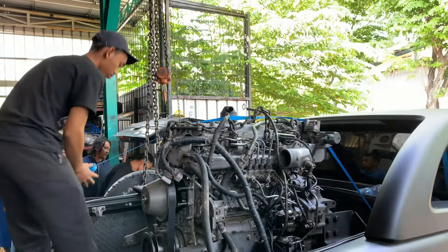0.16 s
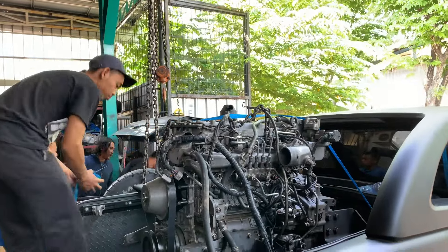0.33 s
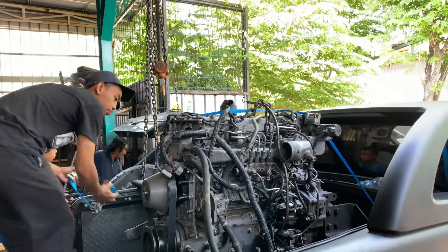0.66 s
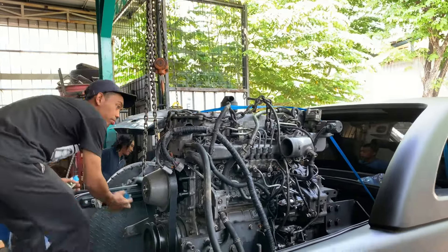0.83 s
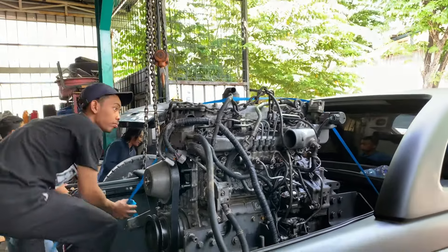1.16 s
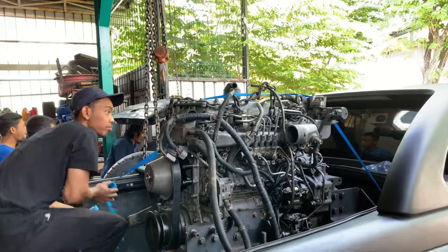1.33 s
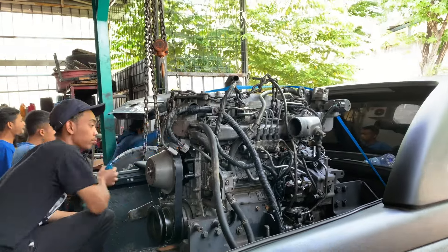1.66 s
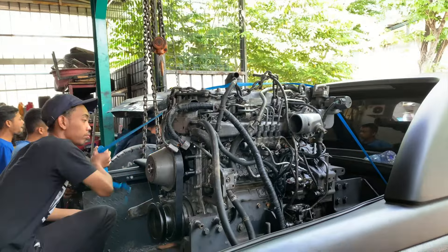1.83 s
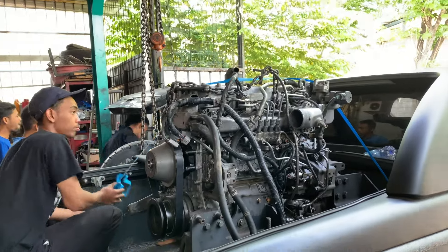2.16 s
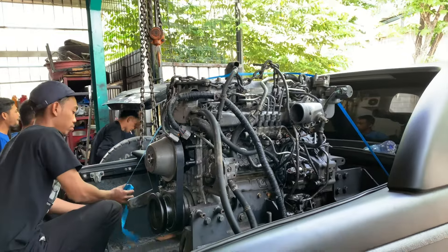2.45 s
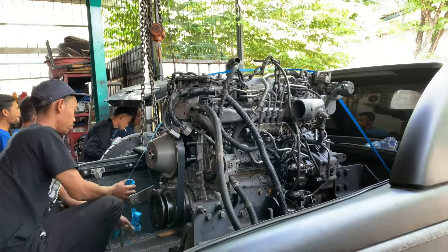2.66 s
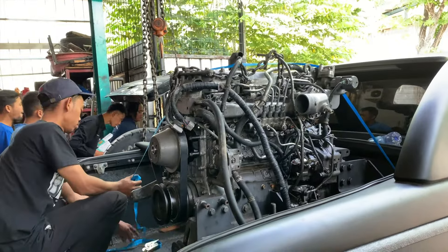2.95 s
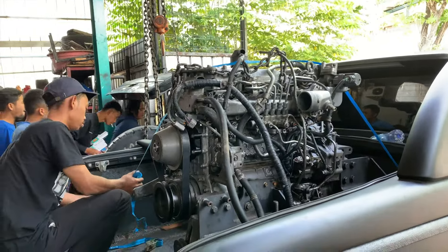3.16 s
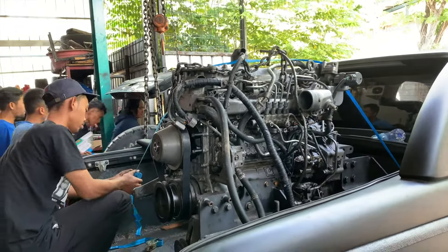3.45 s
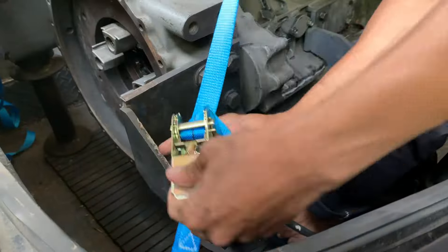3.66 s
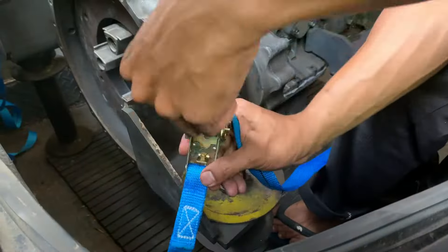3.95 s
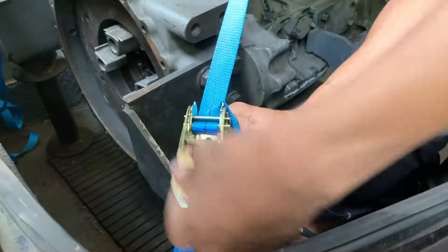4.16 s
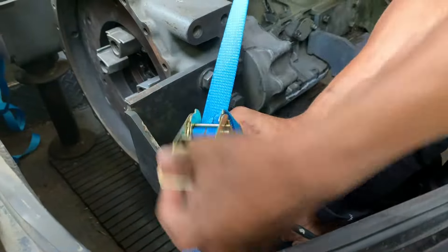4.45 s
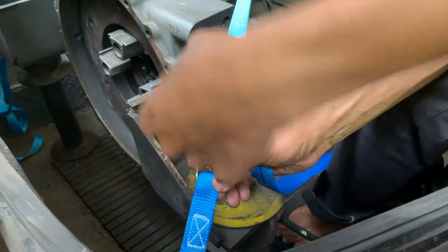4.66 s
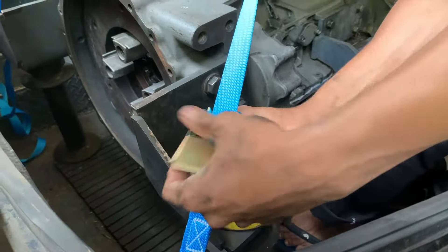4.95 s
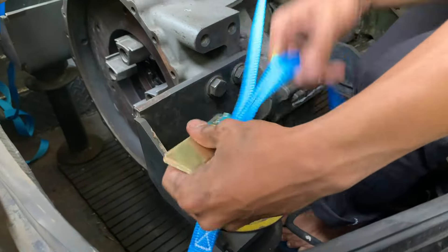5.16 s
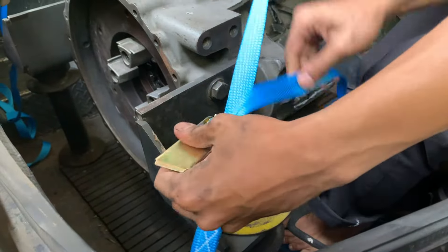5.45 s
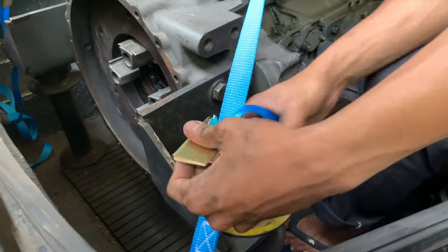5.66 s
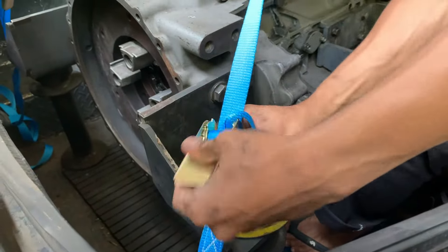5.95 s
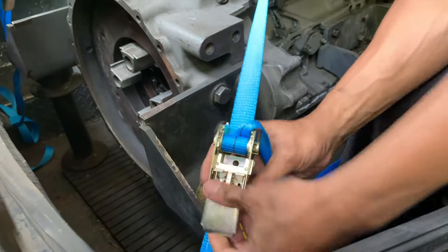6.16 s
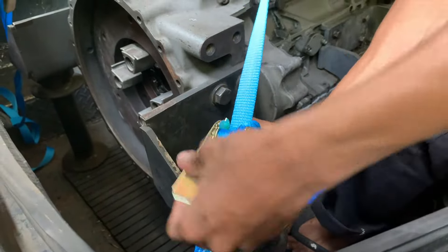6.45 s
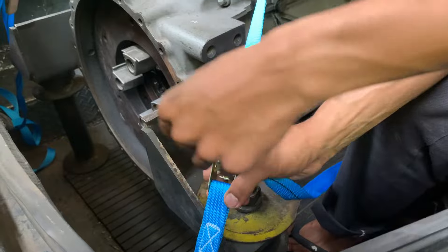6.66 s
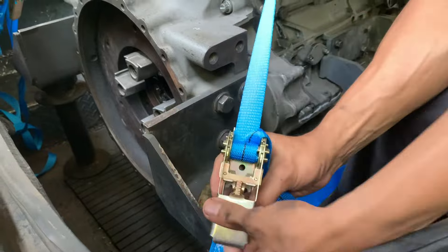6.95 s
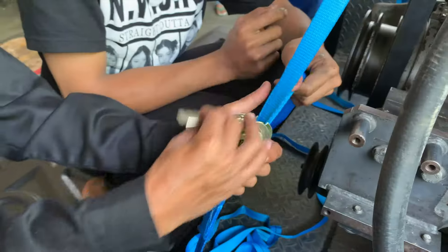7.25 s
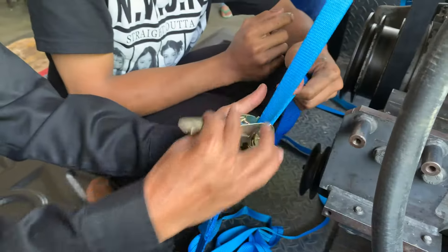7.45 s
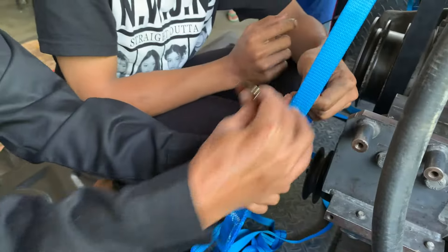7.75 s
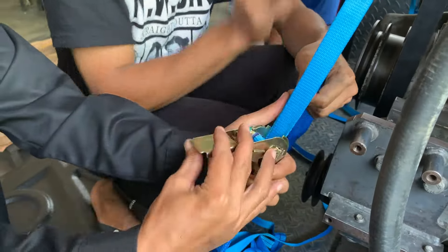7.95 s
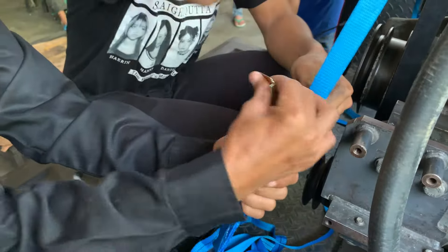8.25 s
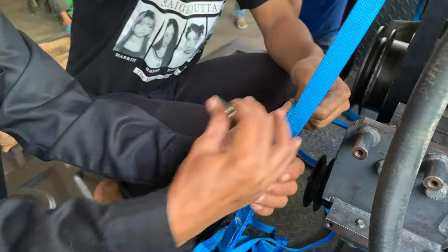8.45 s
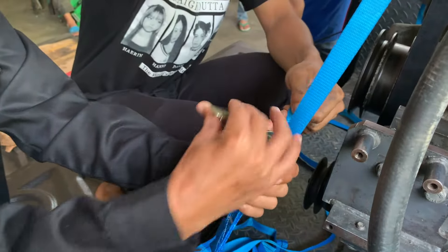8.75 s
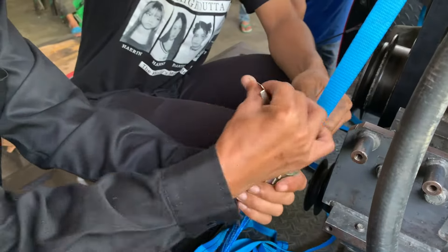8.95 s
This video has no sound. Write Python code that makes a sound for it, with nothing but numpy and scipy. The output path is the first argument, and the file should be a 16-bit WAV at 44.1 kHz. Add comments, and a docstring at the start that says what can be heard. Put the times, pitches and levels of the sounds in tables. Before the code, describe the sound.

A ratchet strap is tightened in sharp, irregular metallic clicks after a few clangs, over distant traffic rumble in an open workshop.

```python
"""An open workshop, where a ratchet strap is tightened. Traffic roars far off; engines pass and idle outside.
Webbing rubs, metal parts clang on a floor further off, low thumps sound. Steel pawls snap over the teeth and
ring the buckle's frame; the handle clacks on its stop. The gain ducks after loud clicks, and both channels
carry one treble signal, shifted in phase."""
import sys
import numpy as np
from scipy import signal
from scipy.fft import rfft, irfft, next_fast_len
from scipy.io import wavfile
from scipy.ndimage import uniform_filter1d, minimum_filter1d, map_coordinates

SR = 44100
rng = np.random.default_rng(int(sys.argv[2]) if len(sys.argv) > 2 else 0)


def generate_wav(sig):
    """Save sig (samples, or channels by samples) to the path in sys.argv[1] as 16-bit PCM at SR."""
    pcm = np.round(np.clip(np.atleast_2d(sig).T, -1, 1) * 32767).astype(np.int16)
    wavfile.write(sys.argv[1], SR, pcm)


N = 401310


def amp(db):
    """dB to gain."""
    return 10 ** (np.asarray(db) / 20)


def unit(x):
    """Scale to rms 1."""
    return x / np.sqrt(np.mean(x ** 2) + 1e-20)


def along(points, hz):
    """Interpolate (freq_hz, value) points on a log axis."""
    freq_hz, values = np.transpose(points)
    return np.interp(np.log(hz + 1), np.log(freq_hz + 1), values)


def curves(spans):
    """Per-sample curve of each column after time_s, then a gate open during the spans."""
    t = np.arange(N) / SR
    time_s, *columns = np.transpose(np.vstack(spans))
    gate = sum((t >= rows[0][0]) & (t < rows[-1][0]) for rows in spans)
    return [np.interp(t, time_s, c) for c in columns] + [uniform_filter1d(gate * 1., size=400)]


def wobble(rate_hz):
    """Smooth random curve, rate_hz knots a second."""
    knots = rng.standard_normal(int(N * rate_hz / SR) + 4)
    return map_coordinates(knots, [np.arange(N) * rate_hz / SR])


def filtered(x, response):
    """Apply a complex frequency response."""
    size = next_fast_len(x.shape[-1] + 8192)
    return irfft(rfft(x, size) * response(np.fft.rfftfreq(size, 1 / SR)), size)[..., :x.shape[-1]]


def coloured(shape, spectrum):
    """Shaped noise, rms 1."""
    return unit(filtered(rng.standard_normal(shape), lambda hz: amp(along(spectrum, hz))))


def add_at(out, start_s, sound):
    """Mix in a sound, cut at the end of out."""
    room = out[..., round(start_s * SR):][..., :sound.shape[-1]]
    room += sound[..., :room.shape[-1]]


# Left-right likeness of the noise: freq_hz, correlation
LIKENESS = [(60, 0.95), (150, 0.89), (380, 0.39), (950, -0.11), (2380, -0.11), (5980, -0.053),
            (15000, 0.15)]


def stereo_noise(spectrum, patchy_db):
    """Shaped stereo noise, rms 1, with random gain patches in time and frequency."""
    bins = signal.stft(rng.standard_normal((2, N)), nperseg=512)[2]
    patches = uniform_filter1d(rng.standard_normal(bins.shape[1:]), size=6, axis=0)
    patches = unit(uniform_filter1d(patches, size=12, axis=1))
    pair = signal.istft(bins * amp(patchy_db * patches), nperseg=512)[1][:, :N]

    def response(hz):
        angle = np.arccos(np.clip(along(LIKENESS, hz), -1, 1)) / 2
        return amp(along(spectrum, hz)) * [np.cos(angle), np.sin(angle)]
    mid, side = filtered(pair, response)
    return unit(np.array([mid + side, mid - side]))


def rattle(t, rattle_ms, fast_t60_s, tail_t60_s, tail_db, spiky_db):
    """Envelope of steel chattering in tiny rebounds: holds, then falls fast to a slower tail."""
    min_flight_s, max_flight_s, contact_s = .0012, .0027, .0005
    flights_s = rng.uniform(min_flight_s, max_flight_s, int(t[-1] / min_flight_s) + 2)
    hits_s = np.cumsum(flights_s) - flights_s[0]
    latest = np.searchsorted(hits_s, t, side="right") - 1
    strength = np.where(latest, rng.uniform(0, .85, len(hits_s))[latest], 1)
    spikes = strength * np.exp(-(t - hits_s[latest]) / contact_s)
    after_s = np.maximum(t - rattle_ms / 1000, 0)
    fall = amp(-60 * after_s / fast_t60_s) + amp(tail_db - 60 * after_s / tail_t60_s)
    return fall * amp(spiky_db * (spikes - .5)) * (1 - np.exp(-t / .0001))


def resonances(peaks, grip_detune=.012):
    """Response of (pitch_hz, width_hz, level_db) peaks; level and pitch vary at each blow."""
    gains = amp(rng.normal(0, 3, len(peaks)))
    tune = 1 + grip_detune * rng.normal(size=len(peaks))
    return lambda hz: sum(
        (-1) ** k * gains[k] * amp(level_db) * 1j * hz * width_hz
        / ((pitch_hz * tune[k]) ** 2 - hz * hz + 1j * hz * width_hz)
        for k, (pitch_hz, width_hz, level_db) in enumerate(peaks))


# Background levels as heard, three spans, with a brief gain dip after the thump at 6 s:
# time_s, rumble_db, roar_db
BACKGROUND_LEVELS = [
    [(0.0, -34, -34), (0.93, -32.5, -32), (1.72, -32, -33.5), (2.05, -31, -34), (2.3, -31, -33),
     (3.07, -29, -28.5), (3.65, -34, -31.5)],
    [(3.67, -34, -32), (3.87, -36.5, -35), (4.31, -36.5, -37.5), (4.6, -37, -37.5), (5.67, -42.5, -40),
     (5.97, -36, -40), (6.0, -30.5, -50), (6.13, -41, -45.5), (6.3, -38.5, -39), (6.6, -39, -38),
     (7.17, -46, -41)],
    [(7.19, -39, -31), (7.402, -46, -35.5), (8.152, -37.5, -34.5), (8.706, -39, -35.5), (9.1, -32.5, -35.5)],
]
# Upper bands per span, relative to the roar: start_s, rush_db, hiss_db
BACKGROUND_BALANCE = [(0, -8.5, -19.5), (3.66, -10, -16), (7.18, -9, -12.5)]
# Spectra of the four bands: freq_hz, density_db
RUMBLE_SPECTRUM = [(15, -66), (25, -62), (48, -3), (91, 0), (108, -7), (150, -7.5), (200, -9), (260, -34.5),
                   (440, -120)]
ROAR_SPECTRUM = [(71, -15), (120, -11), (249, -9), (403, -11.5), (661, -17), (931, -15.5), (1210, -22),
                 (1370, -24.5), (2000, -30), (2600, -61), (4400, -120)]
RUSH_SPECTRUM = [(710, -20), (1200, 4), (1380, 2), (2680, -0.5), (3130, -2.5), (5000, -12), (7500, -16.5),
                 (9750, -57), (16500, -120)]
HISS_SPECTRUM = [(4500, -4), (6500, -11), (8500, -3.5), (11000, -7), (13000, -10), (15800, -12),
                 (16200, -52)]


def background(hiss_swing=1.89):
    """Far traffic as heard: rumble, roar, rush and thin hiss, with a brief gain dip at 6 s."""
    rumble_db, roar_db, _ = curves(BACKGROUND_LEVELS)
    starts_s, *balance_db = np.transpose(BACKGROUND_BALANCE)
    span = np.searchsorted(starts_s[1:], np.arange(N) / SR)
    rush_db, hiss_db = np.array(balance_db)[:, span]
    hiss_db += roar_db.mean() + hiss_swing * (roar_db - roar_db.mean())
    swell = wobble(6.8)
    rumble = amp(rumble_db + .32 * wobble(20)) * stereo_noise(RUMBLE_SPECTRUM, patchy_db=1.2)
    roar = amp(roar_db + .27 * swell) * stereo_noise(ROAR_SPECTRUM, patchy_db=2.2)
    rush = amp(roar_db + rush_db + swell) * stereo_noise(RUSH_SPECTRUM, patchy_db=1)
    hiss = amp(hiss_db + .8 * wobble(8.2)) * stereo_noise(HISS_SPECTRUM, patchy_db=1)
    return rumble + roar + rush + hiss


def engine(spans, orders, swell_db, waver_rad):
    """Multiples of a firing rate, each swelling and wavering on its own."""
    firing_hz, level_db, gate = curves(spans)
    phase = 2 * np.pi * np.cumsum(firing_hz) / SR
    tone = sum(amp(order_db + swell_db * wobble(6.6)) * np.sin(multiple * phase + waver_rad * wobble(7))
               for multiple, order_db in orders)
    return amp(level_db) * gate * unit(tone)


# Engine runs, the idle in two spans: time_s, firing_hz, level_db
PASSING_RUN = [(0.85, 32.8, -62), (1.014, 34.1, -32), (1.3, 30.59, -31.5), (1.86, 27.06, -26),
               (2.4, 25.2, -43)]
IDLE_RUNS = [
    [(1.9, 34.54, -38.5), (2.9, 38, -30.5), (3.124, 34.22, -26), (3.252, 34.35, -30.5), (3.408, 36.58, -29),
     (3.65, 36.96, -27)],
    [(7.17, 35.74, -32), (7.508, 34.9, -36), (7.76, 36.6, -31.5), (8.104, 35.34, -38.5), (8.6, 36.17, -37),
     (8.85, 36.43, -38.5), (8.95, 37.4, -31), (9.1, 37.6, -37)],
]
DRONE_RUN = [(3.66, 60, -31), (4.04, 59.4, -25.5), (4.37, 61.9, -32), (5.12, 59.8, -38.5), (5.4, 56, -48),
             (5.8, 60, -40)]
# Engine harmonics: multiple, relative_db
PASSING_ORDERS = [(2, -9.5), (3, -3.5), (4, -5), (6, -17.5)]
IDLE_ORDERS = [(2, 7), (4, 1.5), (5, 1), (6, 7.5), (9, -11), (10, 1.5), (11, -2.5), (12, -7), (13, -1.5),
               (14, -14.5), (16, -12)]


def engines():
    """Outside, one engine idles, one slows as it passes, one drones."""
    idling = engine(IDLE_RUNS, IDLE_ORDERS, swell_db=2.6, waver_rad=.45)
    passing = engine([PASSING_RUN], PASSING_ORDERS, swell_db=1, waver_rad=.14)
    drone = engine([DRONE_RUN], [(1, 0)], swell_db=1.5, waver_rad=.3)
    return idling + passing + drone


# Rub strokes: centre_s, half_width_s, level_db
RUBS = [(1.575, 0.048, -38.5), (3.9, 0.22, -41), (4.57, 0.4, -46), (6.7, 0.18, -47.5), (7.42, 0.19, -46.5),
        (8.12, 0.19, -43), (8.4, 0.16, -67), (8.75, 0.33, -44)]
# Friction noise: freq_hz, density_db
RUB_SPECTRUM = [(800, -31.5), (2000, 4), (5000, 4.5), (8000, -1), (12000, -5), (15800, -10), (16200, -38)]


def webbing():
    """Webbing, hands and parts rub: scratchy noise that swells and fades."""
    t = np.arange(N) / SR
    effort = sum(amp(level_db) * np.exp(-((t - centre_s) / half_width_s) ** 2)
                 for centre_s, half_width_s, level_db in RUBS)
    scratch = amp(5.1 * wobble(25) + .86 * wobble(330))
    return effort * unit(scratch * stereo_noise(RUB_SPECTRUM, patchy_db=-4.5))


# Metal on the floor: start_s, level_db, thud_relative_db, rattle_ms, t60_s, tilt_db_per_octave, hollow_hz
CLANGS = [(1.602, -21.5, -7.5, 8, 0.24, -3, 1200), (2.125, -38.5, 12.5, 27.5, 0.089, -0.5, 2300),
          (2.255, -35.5, 12, 13, 0.12, -4, 1010), (2.573, -39.5, 6.5, 5.1, 0.059, -1, 815),
          (2.865, -15.5, -7.5, 3.7, 0.073, 5.5, 1410), (2.874, -19.5, -1, 3.8, 0.22, 0, 2040),
          (2.945, -30.5, -28, 8.9, .09, -3, 1400), (3.03, -37, -11, 11, .09, -4, 1400)]
# Chatter and thud noise: freq_hz, density_db
CLANG_SPECTRUM = [(700, -22), (1500, -11), (3800, 5), (6500, 5.5), (9000, -2), (11500, 1), (15500, -11)]
THUD_SPECTRUM = [(60, -22), (120, 10), (350, 12), (800, 3.5), (1400, 1), (2500, -13), (5000, -52)]


def clangs(hollow_db=-4.5, hollow_width_ratio=.63):
    """Loose metal dropped or knocked: a chatter, and a hollow thud that swells just after."""
    out, t = np.zeros((2, N)), np.arange(SR // 2) / SR
    shape = (2, len(t))
    for start_s, level_db, thud_db, rattle_ms, t60_s, tilt_db_per_octave, hollow_hz in CLANGS:
        chatter = rattle(t, rattle_ms, fast_t60_s=.064, tail_t60_s=t60_s, tail_db=-7.5, spiky_db=1)
        peak = resonances([(hollow_hz, hollow_width_ratio * hollow_hz, 0)])
        hollow = unit(filtered(rng.standard_normal(shape), lambda hz: peak(hz) ** 2))
        attack = 1 - np.exp(-(t / .0052) ** 2)
        fall = amp(thud_db - 60 * np.maximum(t - .03, 0) / t60_s)
        thud = attack * fall * (coloured(shape, THUD_SPECTRUM) + amp(hollow_db) * hollow)
        tilted = [(hz, db + tilt_db_per_octave * np.log2(hz / 6000)) for hz, db in CLANG_SPECTRUM]
        add_at(out, start_s, amp(level_db) * (chatter * coloured(shape, tilted) + thud))
    return out


def steel_mode(t, pitch_hz, level_db, t60_s, flicker_db, flicker_hz):
    """One decaying sine with a flickering level."""
    envelope = amp(level_db + flicker_db * wobble(flicker_hz)[:len(t)] - 60 * t / t60_s)
    return envelope * np.sin(2 * np.pi * pitch_hz * t)


# Modes of a steel tool: pitch_hz, relative_db, t60_s
TOOL_MODES = [(3595, -15, .2), (4130, -12, .25), (5870, -15, .1), (6540, -14, .08), (8295, -2, .2),
              (8670, 11, .26), (8785, -6, .2), (9020, -8, .17), (13595, 2, .3), (14100, -8, .15)]


def tool_ring(start_s=1.602, level_db=-22):
    """A steel tool rings at the first clang."""
    out, t = np.zeros(N), np.arange(SR // 2) / SR
    ring = sum(steel_mode(t, *mode, flicker_db=2.2, flicker_hz=70) for mode in TOOL_MODES)
    add_at(out, start_s, amp(level_db) * (1 - np.exp(-t / .006)) * ring)
    return out


# Steel pings: start_s, level_db, pitch_hz, t60_s
PINGS = [(2.952, -26, 11900, 0.045), (2.998, -31, 11830, 0.054), (8.32, -36, 11760, 0.14),
         (8.325, -42, 10300, 0.13)]


def pings():
    """Thin steel rings briefly in one high mode."""
    out, t = np.zeros(N), np.arange(SR // 2) / SR
    for start_s, level_db, pitch_hz, t60_s in PINGS:
        ring = steel_mode(t, pitch_hz, level_db, t60_s, flicker_db=3.8, flicker_hz=95)
        add_at(out, start_s, (1 - np.exp(-t / .0019)) * ring)
    return out


# Low thumps: start_s, level_db, pitch_hz, t60_s
THUMPS = [(2.958, -13.5, 370, 0.14), (8.897, -19.5, 474, 0.07), (5.798, -21, 102, 0.14),
          (5.86, -21.5, 113, 0.084), (5.982, -18, 118, 0.087), (6.82, -22.5, 140, 0.1),
          (7.184, -26.5, 136, 0.17), (7.21, -20.5, 80, 0.23)]


def thumps():
    """Low thumps: a low note with a puff of low noise."""
    out, t = np.zeros(N), np.arange(SR // 2) / SR
    for start_s, level_db, pitch_hz, t60_s in THUMPS:
        knock = np.sin(2 * np.pi * pitch_hz * t) + .15 * coloured(len(t), THUD_SPECTRUM)
        envelope = amp(level_db - 60 * t / t60_s) * (1 - np.exp(-t / .0049))
        add_at(out, start_s, envelope * knock)
    return out


# Pawl snaps, rebounds and scrapes: start_s, level_db, frame_relative_db, rattle_ms
SNAPS = [(3.72, -27, -8, 14), (3.823, -21.5, -1, 7.1), (3.829, -10, -13, 5), (3.842, -24, -4, 3),
         (3.895, -23, -7, 3), (3.9014, -9, -5, 4.4), (4.0098, -31.5, -6, 4), (4.046, -31.5, 1, .5),
         (4.143, -16.5, -3, 2.1), (4.1472, -4.5, -12.5, 0.95), (4.185, -5, -10, 2), (4.191, 0, -17, 1.3),
         (4.382, -30.5, -13, 18.6), (4.4116, -15, -8.5, 2.2), (4.4657, -35, 4.5, 2.6), (4.47, -23, -8, 4),
         (4.4743, -11, -3.5, 3.7), (4.5262, -27, -5, 10), (4.5358, -10, -8.5, 7), (4.681, -33, -7, 12),
         (4.7972, -10, -7, 6.2), (5.013, -26, -20, .3), (5.019, -39, 1, 7.6), (5.91, -44, -4, 2),
         (5.9788, -18, -1.5, 1.5), (5.984, -13.5, -18, 0.85), (6.0637, -18, -12, .6), (6.087, -36, -8, 2),
         (6.0912, -18.5, -10, 1.7), (6.35, -30.5, -7, 10.5), (6.455, -38, 2, 15), (6.4707, -9, -13.5, 2.4),
         (6.5497, -31, 0, 7), (6.5591, -10, -7, 5.9), (6.7337, -42, -7, 11), (6.7502, -39.5, -8, 35),
         (6.857, -9.5, -15, 0.58), (6.864, -24, -1, 1.3), (6.9862, -16, -2.5, 0.6), (7.0103, -29, -1, .3),
         (7.0223, -23, -7, 0.56), (7.204, -28, -12, 1), (7.2217, -39, -6, .8), (7.233, -12.5, -7, 6.3),
         (7.3107, -10.5, -18, 3), (7.3184, -11.5, -10, 1.1), (7.3804, -33, -5, 2.5), (7.417, -41, -14, 3.5),
         (7.424, -29, -16, 8.7), (7.483, -27, -8, 4.2), (7.4927, -14.5, -7.5, 5.8),
         (7.5871, -12.5, -9, 3.44), (7.7372, -26.5, -20, 0.61), (7.774, -35, -12, 2.5),
         (7.8522, -12, -15, 1.5), (7.859, -9, -14, 1.4), (8.088, -34, -15, 4.6), (8.1984, -37, -10, 0.81),
         (8.2172, -12.5, -11.5, 3.7), (8.5112, -10, -10, 4.3), (8.6699, -32, -13, 3.7),
         (8.6776, -20.5, -13, 4.6), (8.718, -25, -8, 2), (8.722, -22, -10, 3), (8.7496, -28, 0, 1.5),
         (8.808, -27.5, 0, .5), (8.833, -31, -4, 5), (9.057, -34.5, -29, 12.2)]
# Pawl chatter: freq_hz, density_db
SNAP_SPECTRUM = [(4500, -38), (6200, -12.5), (7500, -16.5), (8700, 5.5), (10500, 3.5), (13000, 1.5),
                 (15700, 7), (16300, -43)]
# Modes of the buckle's frame: pitch_hz, width_hz, relative_db
FRAME_MODES = [(2200, 240, -10), (2670, 260, -13), (3210, 310, -12), (3650, 160, -15), (4080, 230, -10.5),
               (4704, 260, -3.5), (5240, 230, -2.5), (5820, 230, -2.5), (6210, 300, -3.5), (7120, 310, -1),
               (7496, 190, -1), (8180, 320, 3.5), (9500, 270, 0)]


def pawls():
    """A pawl snaps over a tooth in a bright chatter; the frame rattles on until the hand damps it."""
    out, t = np.zeros((2, N)), np.arange(SR // 5) / SR
    for start_s, level_db, frame_db, rattle_ms in SNAPS:
        chatter = rattle(t, rattle_ms, fast_t60_s=.02, tail_t60_s=.075, tail_db=-12, spiky_db=12)
        clatter = rattle(t, rattle_ms + 1, fast_t60_s=.035, tail_t60_s=.09, tail_db=-13, spiky_db=11)
        shared, left, right = rng.standard_normal((3, len(t)))
        frame = filtered(clatter * (shared + np.array([left, right])), resonances(FRAME_MODES))
        frame *= np.linalg.norm(chatter) / np.linalg.norm(frame[0])
        snap = chatter * coloured(len(t), SNAP_SPECTRUM)
        add_at(out, start_s, amp(level_db) * (snap + amp(frame_db) * frame))
    return out


# Handle on its stop: start_s, level_db, treble_db
CLACKS = [(8.6315, -32.5, 1), (8.68, -36, -5), (8.7685, -24, 5), (8.773, -23, 7), (8.78, -15.5, 6),
          (8.852, -25, 2), (8.902, -42, 16), (8.93, -28, -13), (8.945, -36, 7)]
# Modes of the handle: pitch_hz, width_hz, relative_db
HANDLE_MODES = [(1650, 190, 3.5), (2500, 450, 1), (4280, 460, -5.5), (6130, 450, 2), (7100, 340, -4),
                (7500, 260, -6.5)]


def handle():
    """The handle knocks its stop: a short dull clack through its modes, with a bright edge."""
    out, t = np.zeros((2, N)), np.arange(SR // 10) / SR
    for start_s, level_db, treble_db in CLACKS:
        chatter = rattle(t, rattle_ms=1, fast_t60_s=.022, tail_t60_s=.07, tail_db=-12, spiky_db=10)
        modes = [(hz, width_hz, db + treble_db * (hz > 3000)) for hz, width_hz, db in HANDLE_MODES]
        clack = filtered(chatter * rng.standard_normal((2, len(t))), resonances(modes))
        clack *= np.linalg.norm(chatter) / np.linalg.norm(clack[0])
        edge = amp(treble_db - 9) * chatter * coloured(len(t), SNAP_SPECTRUM)
        add_at(out, start_s, amp(level_db) * (clack + edge))
    return out


# Workshop decay: freq_hz, t60_s
WORKSHOP_DECAY = [(200, 0.2), (2000, 0.69), (8000, 0.38), (15000, 0.21)]


def workshop_reverb(x):
    """The room's tail: each frequency dies at its own rate."""
    hz, t, bins = signal.stft(rng.standard_normal((2, SR // 2)), SR, nperseg=256)
    decay = amp(-60 * t / along(WORKSHOP_DECAY, hz)[:, None])
    tail = signal.istft(bins * decay, SR, nperseg=256)[1]
    return signal.fftconvolve(x, tail / np.linalg.norm(tail[0]), axes=1)[:, :N]


def scene():
    """Near buckle almost dry, far metal reverberant, the rest dry."""
    near = pawls() + handle()
    far = clangs() + tool_ring() + pings()
    reverb = workshop_reverb(amp(-20) * near + amp(-3.5) * far)
    return near + far + reverb + webbing() + thumps() + engines() + background()


def ducking(x, threshold_db=-14, slope=.97, hold_s=.056, glide_s=.06, delay_s=.028):
    """Gain that falls just after a peak passes the threshold, holds, and glides back."""
    peak_db = 20 * np.log10(uniform_filter1d(np.abs(x).max(axis=0), size=40) + 1e-6)
    cut_db = -slope * np.maximum(peak_db - threshold_db, 0)
    window = int(hold_s * SR) | 1
    held_db = minimum_filter1d(cut_db, size=window, origin=window // 2)
    pole = np.exp(-1 / (glide_s * SR))
    glide_db = signal.lfilter([1 - pole], [1, -pole], held_db)
    gain_db = uniform_filter1d(np.minimum(held_db, glide_db) + .61 * glide_db, size=800)
    return amp(np.pad(gain_db, (int(delay_s * SR), 0))[:N])


# Channel balance: freq_hz, left_minus_right_db
BALANCE = [(60, -2.5), (200, -1.6), (600, 1.2), (1500, 1.5), (3000, .4), (4500, -2), (7000, 0)]


def record(dry, crossover_hz=6900, ceiling=.9, top_hz=16600):
    """Ducking; right treble is the left's, turned in phase; balance, soft clip, low-pass."""
    left, right = dry * ducking(dry)
    treble_share = lambda hz: 1 / (1 + (crossover_hz / (hz + 1)) ** 14)
    turn_rad = lambda hz: 2 * np.pi * (11000 - hz) / 4800
    right_low = filtered(right, lambda hz: np.sqrt(1 - treble_share(hz)))
    right_high = filtered(left, lambda hz: np.sqrt(treble_share(hz)) * np.exp(-1j * turn_rad(hz)))
    pair = np.array([left, right_low + right_high])
    balanced = filtered(pair, lambda hz: amp(np.array([[.5], [-.5]]) * along(BALANCE, hz)))
    clipped = balanced / (1 + np.abs(balanced / ceiling) ** 8) ** (1 / 8)
    return filtered(clipped, lambda hz: 1 / (1 + (hz / top_hz) ** 200))


dry = scene()
out = record(dry)
generate_wav(out)
```